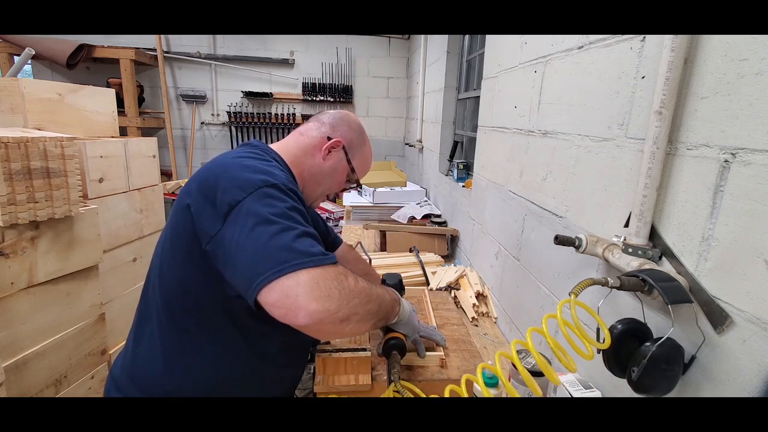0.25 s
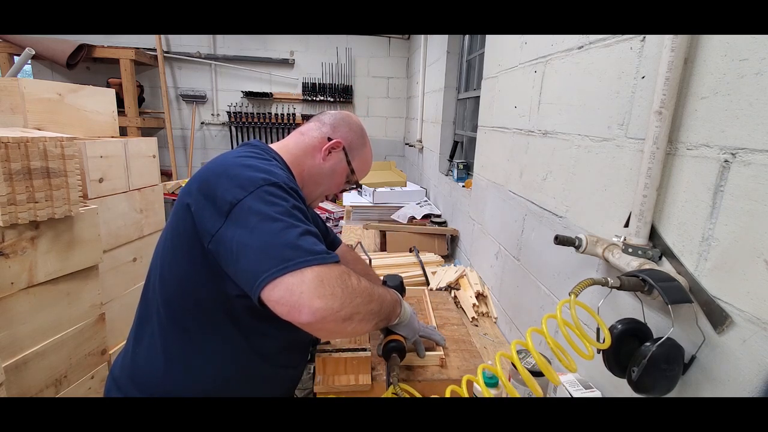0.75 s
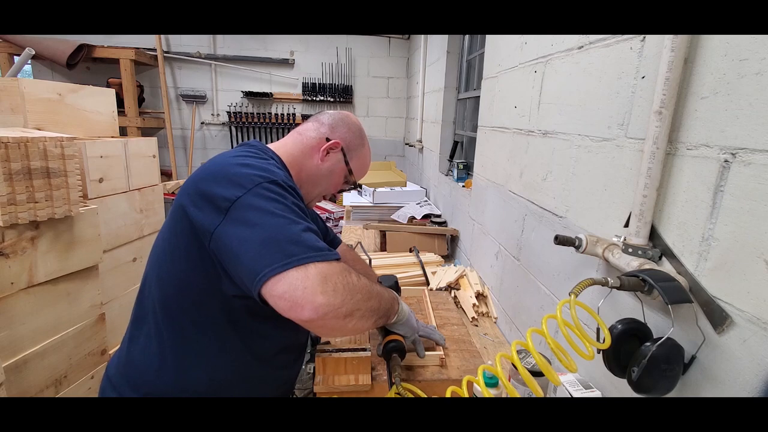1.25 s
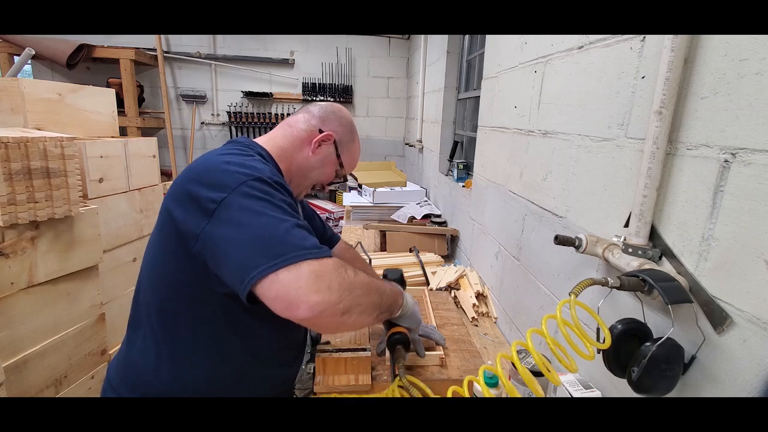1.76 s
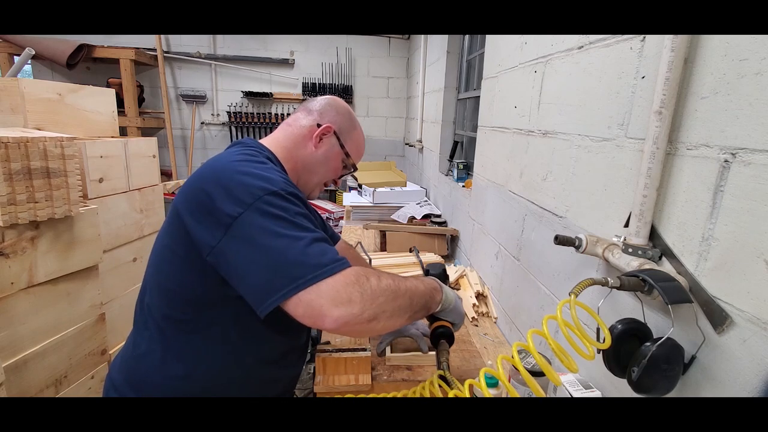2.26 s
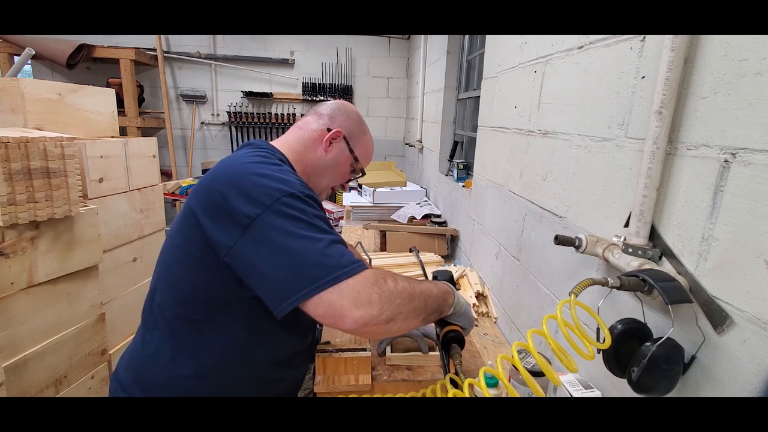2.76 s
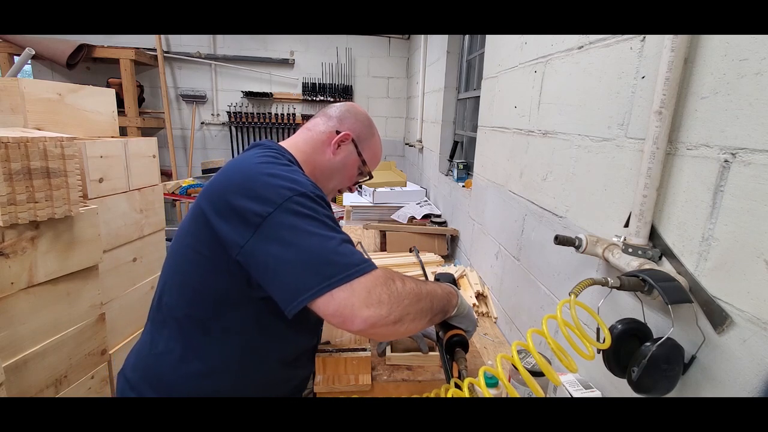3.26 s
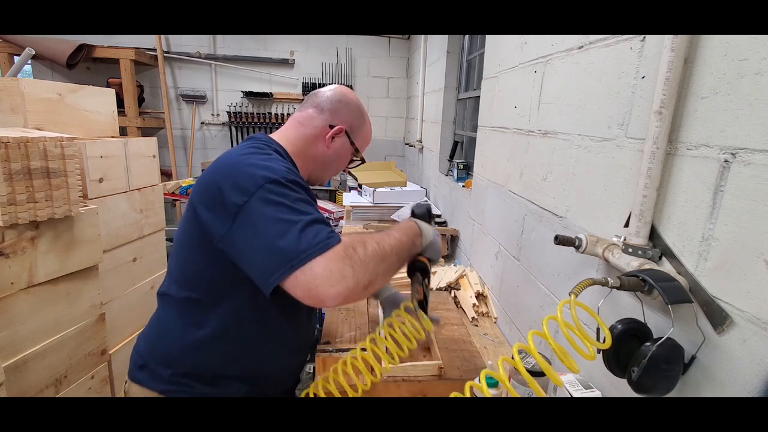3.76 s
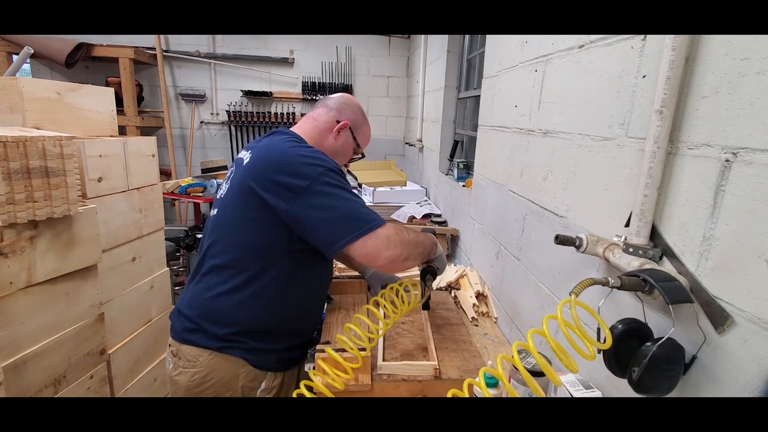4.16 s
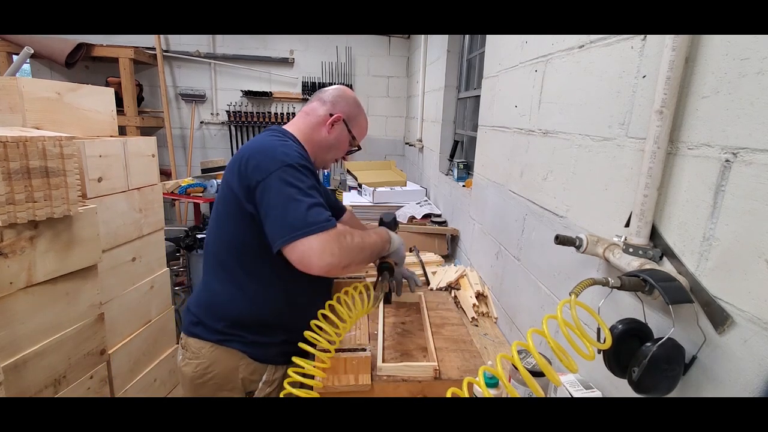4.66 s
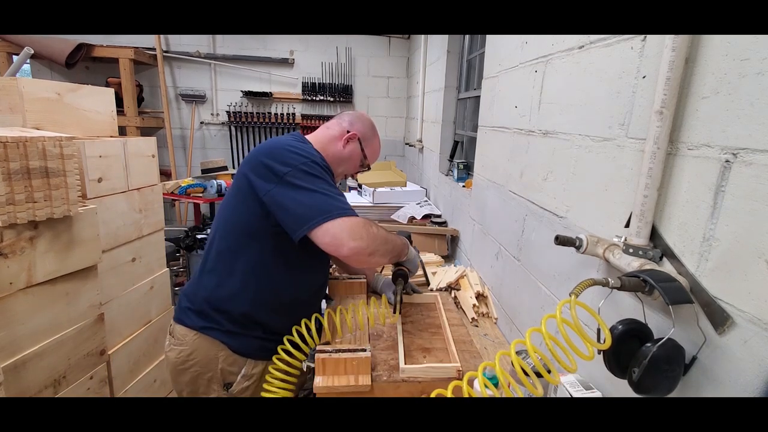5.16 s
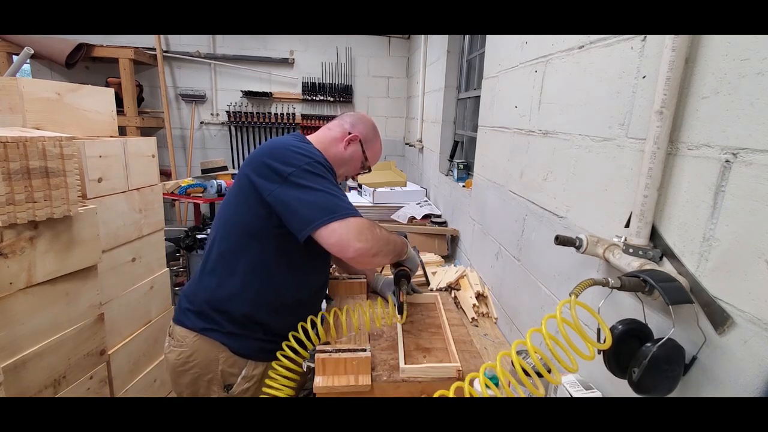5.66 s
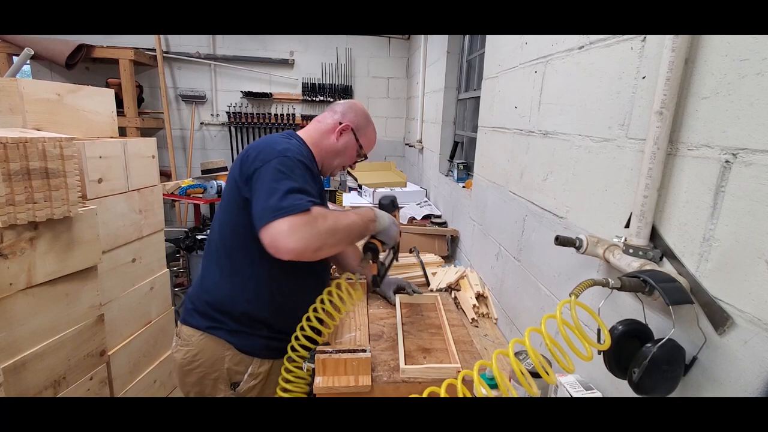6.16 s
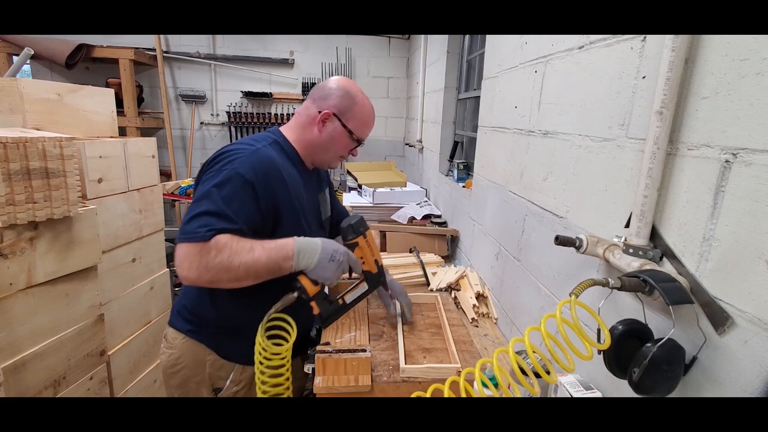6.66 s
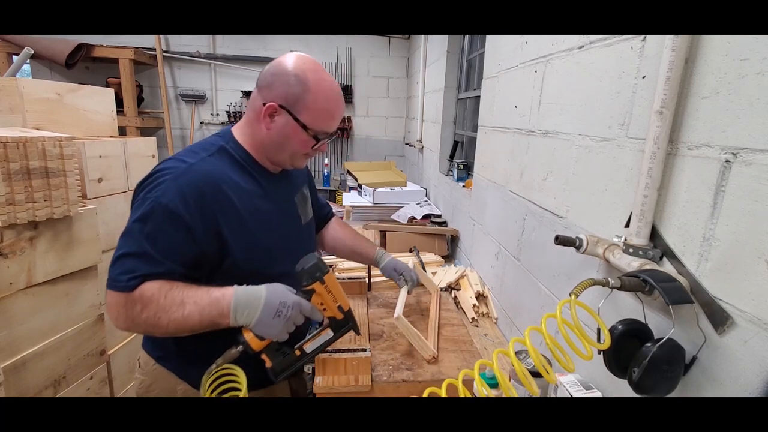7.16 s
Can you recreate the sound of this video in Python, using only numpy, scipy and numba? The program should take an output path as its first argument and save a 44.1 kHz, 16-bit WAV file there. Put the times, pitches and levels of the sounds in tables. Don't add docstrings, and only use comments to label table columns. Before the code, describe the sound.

In a hard-walled workshop, a pneumatic stapler's nose taps and scrapes on wood over low rumble and faint air leak. Four violent shots follow, spaced unevenly, each a pop, slam and bench boom, then a bright exhaust burst about a tenth of a second later. Between them a light pine frame knocks and slides, the hose chirps, and steel clanks before the last shot. Close, overloading phone stereo pickup.

```python
import sys
import numpy as np
from scipy import signal
from scipy.fft import rfft, irfft, next_fast_len
from scipy.io import wavfile
from scipy.ndimage import map_coordinates
from numba import njit

SR = 44100
rng = np.random.default_rng(int(sys.argv[2]) if len(sys.argv) > 2 else 0)


def unload_audio(sound):
    columns = np.transpose(np.atleast_2d(sound))
    steps = np.round(np.clip(columns, -1, 1) * 32767)
    wavfile.write(sys.argv[1], SR, steps.astype(np.int16))


def gain_from_db(level_db):
    decades = np.asarray(level_db, float) / 20
    return 10 ** decades


N = 327486
SPAN = SR // 4

# (frequency [Hz], level [dB per Hz])
RUMBLE_COLOUR = [(15, -54), (25, -16), (98, 1), (130, -10), (182, -5), (358, -25.5), (468, -23), (518, -26),
                 (776, -28.5), (1400, -50), (1820, -70.5), (3080, -120)]
# (frequency [Hz], level [dB per Hz])
SLIDE_COLOUR = [(530, -30), (900, 1.5), (1630, -8), (1870, -16.5), (2010, -6.5), (2620, -13), (3210, -6),
                (4750, -16.5), (8000, -16.5), (10400, -40), (17600, -120)]
# (frequency [Hz], level [dB per Hz])
LEAK_COLOUR = [(3000, -30), (4500, -8), (7200, -6), (9300, -8), (10300, 1), (11200, 4), (12500, 1),
               (15700, 0)]
# (frequency [Hz], level [dB per Hz])
HUM_COLOUR = [(12, -41.5), (20, -0.5), (75, -5.5), (231, -20), (299, -13), (600, -26), (780, -59.5),
              (1320, -120)]
# (time [s], level [dB])
MUTING = [(0, -1), (1.6, -1), (2.1, -28), (2.4, -15.5), (3.02, -15), (3.25, 5), (3.8, -18), (4.01, -5),
          (4.73, -6), (4.92, 0), (5.11, 1), (5.3, 2.5), (5.85, 1.5), (6.45, -12.5), (6.7, -11),
          (6.86, -1.5), (7.07, 13.5), (7.43, 3.5)]
# (time [s], level [dB])
LEANING = [(0, -40.5), (0.76, -45), (1.01, -54), (1.3, -49), (1.7, -51), (2.33, -81.5), (2.65, -84),
           (3.02, -43.5), (3.3, -51), (3.75, -39), (4.45, -41), (4.73, -52), (5.25, -36), (5.63, -40.5),
           (5.8, -28.5), (6.5, -66), (6.84, -56), (6.9, -38)]
# (middle [s], half length [s], level [dB])
STROKES = [
    (0.02, 0.29, -62.5),
    (3.62, 0.13, -44),
    (4.419, 0.18, -52.5),
    (4.744, 0.41, -59),
    (5.245, 0.17, -56),
    (6.224, .2, -72),
    (6.907, 0.23, -78),
    (7.085, 0.12, -78.5),
    (7.346, 0.12, -56),
]

# (frequency [Hz], t60 [s])
ROOM_DECAY = [(60, 0.93), (200, 0.39), (700, 0.34), (2000, 0.43), (5000, 0.5), (12000, 0.33)]
# (frequency [Hz], level [dB])
TAIL_COLOUR = [(60, -7), (300, 1.5), (1000, -1), (15000, -3)]
# (frequency [Hz], likeness [0..1])
LIKENESS = [(25, .85), (60, 0.93), (200, 1), (500, 0.7), (1200, 0.055), (4000, 0.046), (15000, 0.035)]
# (frequency [Hz], level [dB])
SIDES = [(60, -2), (300, -4.5), (1200, -5.5), (4000, -6.5), (15000, -4.5)]

# (time [s], frequency [Hz], level [dB rms], t60 [s])
SHAKES = [(.433, 3450, -56.5, 0.047), (1.176, 2800, -51, 0.042), (1.222, 2750, -60, .05),
          (1.318, 2700, -58, .05), (1.373, 1600, -61, .15), (1.376, 800, -54.5, 0.1),
          (2.541, 5700, -64, .18), (2.615, 2800, -73, .1), (2.764, 1005, -61, .25),
          (2.764, 2000, -68, 0.18), (2.764, 3300, -69, 0.2), (2.956, 2800, -66, 0.29),
          (2.956, 1512, -60.5, 0.27), (3.075, 1005, -52.5, 0.074), (3.997, 1055, -39.5, 0.22),
          (4.719, 3300, -46, 0.06), (4.719, 1500, -44.5, 0.12), (4.768, 1450, -38, 0.083),
          (5.056, 1320, -42.5, 0.33), (5.056, 2300, -54, 0.25), (6.848, 3120, -62, 0.078),
          (7.035, 3400, -51, .06), (7.047, 3200, -52.5, .12), (7.072, 3300, -52.5, 0.23),
          (7.136, 3400, -55, .15), (7.17, 3220, -58, 0.17)]
# (time [s], level [dB], frequency [Hz], t60 [s])
BOARDS = [(.148, -20, 485, 0.092), (.21, -32, 492, 0.16), (0.298, -30, 197, 0.24), (0.685, -22, 234, 0.062),
          (.709, -31.5, 592, 0.11), (0.758, -23, 76, 0.29), (1.577, -14.5, 428, 0.22),
          (1.586, -5, 295, 0.11), (1.605, -11, 684, 0.044), (1.63, -13, 860, 0.026),
          (1.65, -13, 497, 0.065), (3.286, 0.5, 552, 0.062), (3.295, -8, 323, 0.089),
          (3.315, -5, 664, 0.064), (3.34, -11, 808, 0.069), (3.377, -3, 540, 0.025),
          (3.754, -23, 240.5, 0.24), (3.795, -26, 430, 0.072), (3.818, -15.5, 205, 0.12),
          (3.855, -23.5, 321, 0.13), (4, -41, 1020, 0.15), (4.059, -4, 810, 0.065),
          (4.064, -12, 1216, 0.048), (4.072, -1.5, 760, 0.031), (4.079, -1.5, 203, 0.11),
          (4.09, -2, 305, 0.1), (4.098, -2.5, 846, 0.046), (4.446, -46, 1057, .15), (4.462, -42.5, 802, .1),
          (4.621, -44, 1053, 0.089), (5.352, -21.5, 103.3, 0.39), (5.638, -15.5, 510, 0.095),
          (5.663, -29, 470, 0.06), (5.688, -19, 484, 0.09), (5.713, -24.5, 476, 0.076),
          (5.764, -30.5, 473, 0.052), (5.824, -8.5, 1174, 0.062), (5.84, -3, 225.6, 0.16),
          (5.849, -7.5, 630, 0.078), (5.865, -3.5, 410, 0.078), (5.88, -13.5, 726, 0.037),
          (7.309, -18.5, 797, 0.086), (7.32, -15, 428, 0.068), (7.389, -24, 195, 0.32)]
# (time [s], level [dB], frequency [Hz], t60 [s])
MORE_BOARDS = [(.149, -25, 730, 0.063), (.16, -25, 333, 0.086), (.434, -31, 330, .12), (.44, -48, 550, 0.088),
               (.703, -33, 481, .12), (.74, -35.5, 556, 0.11), (0.836, -27, 85, 0.16), (1.346, -33, 95, 0.54),
               (3.746, -27.5, 618, .07), (3.77, -28.5, 760, .06), (3.878, -28.5, 200, 0.17),
               (4, -27.5, 110, .3), (4.066, -6, 120.6, 0.35), (5.523, -12.5, 97.6, 0.28),
               (5.637, -24, 987, 0.065), (5.637, -28.5, 1285, 0.041), (5.642, -27.5, 710, 0.075),
               (5.696, -32.5, 900, 0.092), (6.875, -36, 199.8, 0.34), (6.88, -50, 330, 0.22),
               (0.1526, -11, 192, 0.2), (6.865, -31.5, 92, .5), (7.02, -33, 95, 0.47), (7.136, -24, 96, 0.42),
               (6.277, -44, 1350, .014), (6.314, -43, 1290, 0.016), (7.311, -17.5, 99.9, 0.19),
               (6.381, -42, 3720, .012)]
# (middle [s], half length [s], frequency [Hz], level [dB rms])
SCRAPES = [(0.132, 0.0063, 3138, -40.5), (0.71, 0.034, 2990, -51.5), (1.2015, 0.034, 2840, -65.5),
           (1.339, 0.034, 2630, -65), (2.547, 0.026, 3086, -69), (3.2, 0.012, 6130, -60.5),
           (3.229, 0.0099, 6440, -49), (3.5, .012, 2833, -54), (4.9, .04, 3200, -50),
           (6.4, 0.0092, 2785, -63), (6.785, 0.056, 3600, -57), (7.205, 0.073, 3500, -59.5),
           (4.464, 0.028, 1973, -50.5), (6.733, 0.038, 3770, -64), (5.644, 0.0072, 1089, -51.5),
           (5.703, 0.019, 901, -51.5), (7.315, 0.011, 530, -29.5), (0.71, .02, 1147, -44.5),
           (4.571, 0.11, 1056, -54), (0.159, .014, 2700, -54), (0.14, .012, 3900, -39),
           (3.75, 0.011, 3600, -47.5), (3.859, 0.008, 1990, -59), (4.776, .025, 1495, -45),
           (7.148, 0.14, 250, -53)]
# (middle [s], half length [s], frequency [Hz], level [dB])
SQUEAKS = [
    (4.452, .012, 2130, -55),
    (4.54, .012, 2130, -55),
    (4.56, .02, 2150, -61),
    (4.617, .024, 2130, -50),
    (4.65, .01, 2170, -58),
    (6.24, .04, 1500, -62),
]
# (time [s], peak level [dB], thump level [dB])
CLANK = [
    (5.218, -14.5, -33),
    (5.2268, -20, -38.5),
    (5.238, -22, -39),
]
# (frequency [Hz], level [dB], t60 [s])
MAGAZINE_MODES = [(890, -11.5, 0.32), (1124, -4, 0.11), (1394, -7, 0.046), (1690, -3.5, 0.08),
                  (1873, -5, 0.12), (2300, -2, 0.039), (2460, -14.5, 0.17), (2620, 2.5, 0.026),
                  (3300, -13.5, 0.049), (4000, -13.5, 0.023), (4660, -16.5, 0.054)]
# (time [s], clack level [dB], hardness = tick over clack [dB], bench thump level [dB], thump pitch [Hz])
TAPS = [(0.0224, -39, -22, -34.5, 198.5), (0.099, -50, -1.5, -31, 188), (0.147, -10.5, -11.5, -13, 192.7),
        (0.4329, -38.5, -30, -26.5, 196), (0.671, -52, -19, -30, 189.7), (0.699, -30.5, -20, -24.5, 72),
        (1.1763, -52, -11, -56, 77), (1.3106, -56, -1.5, -39.5, 90.4), (3.6381, -35, -7, -25.5, 242),
        (4.7188, -28, -18.5, -23.5, 111.5), (4.768, -23, -12.5, -28, 188.3),
        (5.0616, -39, -21.5, -38.5, 184.5), (5.109, -17.5, -26.5, -24.5, 249),
        (5.1605, -27, -15, -34.5, 111.9), (5.3574, -38.5, -15.5, -26.5, 95.8), (5.414, -39, -32, -34, 86),
        (6.196, -27.5, -27.5, -49.5, 71.2), (6.2763, -31, -26, -57.5, 108.9), (6.3135, -53, -10, -49, 174),
        (6.3825, -42.5, -2.5, -55, 133.2), (6.873, -58.5, -12.5, -45, 102.4),
        (7.1396, -62.5, -6.5, -48, 94), (7.423, -43, -10, -28, 73.4)]
# (time [s], wood level [dB], edge = clack over wood [dB], bench thump level [dB], thump pitch [Hz])
BUMPS = [(0.8341, -58, -3, -39, 85.2), (1.3801, -47.5, -11.5, -34, 94.9), (2.5435, -48.5, 0.5, -57, 256.7),
         (2.766, -53.5, -5, -58, 187.4), (2.8272, -53, -10, -54.5, 191), (2.9594, -42.5, -8.5, -35, 83.1),
         (3.0751, -43, -8, -31.5, 76.7), (3.7433, -22, -13.5, -19, 237.5),
         (3.798, -33, -26.5, -25.5, 119.9), (3.854, -33, -18, -26, 110.5),
         (3.9518, -35.5, -13.5, -46.5, 95.8), (3.998, -31.5, -2, -32.5, 96.8),
         (4.851, -43, -9, -31.5, 168.5), (5.5233, -39, -27, -29.5, 99.3), (5.576, -30.5, -11.5, -22, 79.6),
         (5.636, -23.5, -30, -27, 123), (5.688, -31, -34.5, -28.5, 96.7), (6.9085, -75, -7, -29, 97),
         (7.2111, -65, -3.5, -36, 95.5), (7.3096, -20, -12.5, -9, 200.9)]
# (frequency [Hz], level [dB], t60 [s])
NOSE_MODES = [(1450, -2, 0.0067), (2040, -5, 0.015), (2800, 0, .011), (3400, -2.5, 0.011),
              (3940, -2.5, 0.014)]
# (frequency [Hz], level [dB], t60 [s])
FRAME_MODES = [(438, 0.5, 0.086), (560, 0.5, 0.029), (760, -5, 0.045), (1044, -9, 0.024),
               (1320, -24.5, 0.02)]
# (frequency [Hz], level [dB], t60 [s])
BENCH_MODES = [(75.54, -0.5, 0.48), (115, 2.5, 0.21), (192, 6.5, 0.15), (252, -2, 0.16), (293, -4, 0.35),
               (356, -4.5, 0.32), (420, -9.5, 0.15), (560, -3.5, 0.42), (665, -7, 0.057), (723, -9, 0.22),
               (925, -13.5, 0.035), (1370, -6.5, 0.17)]
# (frequency [Hz], level [dB per Hz])
GRAIN_COLOUR = [(250, -12.5), (450, 1), (800, -3.5), (1300, -11), (1800, -26), (3000, -42), (6000, -78.5)]
# (frequency [Hz], level [dB per Hz])
CLACK_COLOUR = [(290, -39.5), (500, -10), (1430, -8.5), (1880, -5.5), (2080, -12), (2580, -7.5),
                (4280, -18.5), (15600, -35)]
# (frequency [Hz], level [dB per Hz])
TICK_COLOUR = [(2500, -31.5), (5000, -1.5), (9000, -5), (15800, -6)]

# (time [s], valve pop [dB], piston slam [dB], bench boom [dB], boom pitch [Hz])
SHOTS = [
    (1.5599, -2.5, -5.5, -11.5, 198.4),
    (3.2662, 0.5, -8.5, -8, 191.5),
    (4.0476, -2.5, -6.5, -8, 123.1),
    (5.8201, -0.5, -6.5, -12, 221.2),
]
TRAVEL = [
    .014,
    0.011,
    .0113,
    .0117,
]
# (time [s], valve pop [dB], exhaust level [dB rms], exhaust length [s], piston return knock [dB])
RELEASES = [
    (1.6915, 3.5, -2.5, 0.046, -21.5),
    (3.3907, 4.5, -3.5, 0.046, -27.5),
    (4.1382, 4.5, 0, 0.048, -28.5),
    (5.905, 3.5, -0.5, 0.047, -19),
]
# (frequency [Hz], level [dB], t60 [s])
DRIVER_MODES = [(1115, -2.5, 0.024), (1750, 1.5, 0.023), (2700, -1, 0.014), (3410, -3.5, .015),
                (4380, -4, .012)]
# (frequency [Hz], level [dB per Hz])
SLAM_COLOUR = [(180, -32), (300, -2.5), (809, -13.5), (1090, -14), (1350, -12.5), (2040, -14),
               (2750, -13.5), (5510, -20.5), (11800, -22), (15600, -27.5)]
# (frequency [Hz], level [dB per Hz])
EXHAUST_COLOUR = [(350, -45), (600, -4.5), (903, -14), (1050, -10), (1940, -10.5), (2800, -2.5), (3530, 2),
                  (4110, -0.5), (6710, 2.5), (9830, -2), (11100, 4), (14000, -0.5), (15600, 6.5)]
# (frequency [Hz], level [dB per Hz])
RATTLE_COLOUR = [(24, -44.5), (40, -11.5), (91, 1), (146, 6), (205, -0.5), (556, -10), (660, -12),
                 (740, -8), (997, -17), (1200, -16), (1560, -49.5), (2640, -120)]


def unit(x):
    return x / np.sqrt(np.mean(x ** 2) + 1e-20)


def along(points, hz):
    f, v = np.transpose(points)
    return np.interp(np.log(hz + 1), np.log(f + 1), v)


def after(t, delay):
    return np.clip(t - delay, 0, 1)


def decay(t, t60):
    return gain_from_db(-60 * t / t60)


def swell(t, length):
    return np.exp(-((t - length) / (length * 0.51)) ** 2)


def wobble(rate):
    knots = rng.standard_normal(int(N * rate / SR) + 4)
    return map_coordinates(knots, [np.arange(N) * rate / SR])


def lumps(db, hold):
    return gain_from_db(db * np.repeat(rng.standard_normal(SPAN // hold + 1), hold)[:SPAN])


def filtered(x, response):
    m = next_fast_len(x.shape[-1] + 4096)
    return irfft(rfft(x, m) * response(np.fft.rfftfreq(m, 1 / SR)), m)[..., :x.shape[-1]]


def spread(two):
    def mid_side_gain(hz):
        turn = np.arccos(np.clip(along(LIKENESS, hz), 0, 1)) / 2
        return np.array([np.cos(turn), np.sin(turn)])

    mid, side = filtered(two, mid_side_gain)
    return np.array([mid + side, mid - side])


def noise(colour, count):
    return unit(filtered(rng.standard_normal(count), lambda hz: gain_from_db(along(colour, hz))))


def pair(colour, count):
    return spread(np.array([noise(colour, count), noise(colour, count)]))


def ring(modes, t, attack, scatter_db=3, detune=.03):
    hz, db, t60 = np.transpose(modes)[..., None]
    size, bend = rng.standard_normal((2, *hz.shape))
    waves = gain_from_db(db + scatter_db * size) * decay(t, t60) * np.sin(2 * np.pi * hz * (1 + detune * bend) * t)
    sign = (-1.) ** np.arange(len(modes))[:, None]
    return (sign * waves).sum(0) * (1 - np.exp(-t / attack))


def add(out, s, dry, wet_db, mute_db=55, bass_db=0):
    hz, t, z = signal.stft(rng.standard_normal((2, SR * 3 // 4)), SR, nperseg=256)
    hz = hz[:, None]
    tail_db = along(TAIL_COLOUR, hz) + bass_db * (hz < 300)
    tail_db = tail_db - 60 * t / along(ROOM_DECAY, hz) - mute_db * t * t
    tail = signal.istft(z * gain_from_db(tail_db), SR, nperseg=256)[1]
    tail = spread(tail * np.clip(np.arange(tail.shape[1]) / (0.024 * SR) - .2, 0, 1))
    answer = gain_from_db(wet_db) * tail / np.linalg.norm(tail, axis=1, keepdims=True)
    answer[:, 0] += 1
    lags = rng.uniform(.001, .012, 6) + rng.uniform(0, 0.00042, (2, 6))
    answer[[[0], [1]], (lags * SR).astype(int)] += .2 * rng.uniform(-1, 1, 6)
    both = signal.fftconvolve(np.atleast_2d(dry), answer, axes=1)
    start = round(s * SR)
    out[:, start:start + both.shape[1]] += both[:, :N - start]


def stirred(t, db, fall, bend):
    since = t - np.array(RELEASES)[:, :1]
    fading = gain_from_db(db - fall * np.abs(since) - bend * since ** 2)
    return (fading * np.clip(since / .02, 0, 1)).sum(0)


def background():
    t = np.arange(N) / SR
    through = gain_from_db(np.interp(t, *np.transpose(MUTING)))
    leaning = gain_from_db(np.interp(t, *np.transpose(LEANING)))
    strokes = sum(gain_from_db(db) * swell(t - s + half, half) for s, half, db in STROKES)

    rumble_gain = leaning + stirred(t, db=-30, fall=49, bend=80)
    rumble = rumble_gain * gain_from_db(4.2 * wobble(14)) * pair(RUMBLE_COLOUR, N)
    slide_gain = gain_from_db(-71) * through + strokes + stirred(t, db=-44.5, fall=30, bend=700)
    slide = slide_gain * gain_from_db(1.3 * wobble(42) + 0.67 * wobble(290)) * pair(SLIDE_COLOUR, N)
    hiss_gain = gain_from_db(-65) * through + stirred(t, db=-41, fall=60, bend=350)
    hiss = hiss_gain * gain_from_db(.8 * wobble(11.0)) * pair(LEAK_COLOUR, N)
    return rumble + slide + hiss + gain_from_db(-71.0) * pair(HUM_COLOUR, N)


def shakes():
    out, t = np.zeros((2, N + SPAN)), np.arange(SPAN) / SR
    for s, hz, db, t60 in SHAKES:
        colour = [(hz * .4, -40), (hz * 0.92, -14), (hz, 0), (hz * 1.15, -14), (hz * 2.3, -30), (hz * 4, -70)]
        envelope = gain_from_db(db) * decay(t, t60) * (1 - np.exp(-t / 0.0016))
        out[:, round(s * SR):][:, :SPAN] += envelope * lumps(3, 100) * pair(colour, SPAN)
    return out[:, :N]


def boards():
    out, t = np.zeros((2, N + SPAN)), np.arange(SPAN) / SR
    for s, db, hz, t60 in BOARDS + MORE_BOARDS:
        side, upper = rng.uniform(-1.1, 1, 2)
        upper_hz = hz * (1.9 + 0.29 * upper)
        note = np.sin(2 * np.pi * hz * t) + 0.054 * decay(t, t60) * np.sin(2 * np.pi * upper_hz * t)
        note *= gain_from_db(db) * decay(t, t60) * (1 - np.exp(-t * hz / 1.1))
        out[:, round(s * SR):][:, :SPAN] += note * gain_from_db(1.5 * side * np.array([[1], [-1]]))
    return out[:, :N]


def scrapes(out):
    t = np.arange(SPAN) / SR
    for s, length, hz, db in SCRAPES:
        colour = [(hz * .3, -22), (hz * .85, -9), (hz, 0), (hz * 1.15, -8),
                  (hz * 2.5, -22), (hz * 5, -38), (hz * 9, -70)]
        drag = gain_from_db(db) * swell(t, length) * lumps(2.2, 100) * pair(colour, SPAN)
        add(out, s - length, drag, wet_db=-7.0)


def hose_squeaks(out):
    t = np.arange(SPAN) / SR
    for s, length, hz, db in SQUEAKS:
        phase = 2 * np.pi * hz * t + 0.14 * np.cumsum(rng.standard_normal(SPAN))
        tone = np.sin(phase) + .6 * np.sin(phase / 2)
        add(out, s - length, gain_from_db(db) * swell(t, length) * tone, wet_db=-10)


def magazine_clank(out):
    t = np.arange(SPAN) / SR
    for s, db, thump_db in CLANK:
        crack = decay(t, 0.05) * pair(CLACK_COLOUR, SPAN)
        tones = ring(MAGAZINE_MODES, t, .0003, scatter_db=3, detune=.012)
        steel = gain_from_db(db - 8.5) * (tones + 1.4 * crack)
        add(out, s, steel + gain_from_db(thump_db) * ring(BENCH_MODES[:6], t, 0.00083), wet_db=-6)


def contacts():
    events = []
    for s, clack_db, hardness, thump_db, hz in TAPS:
        wood_db = (clack_db + thump_db) / 2 - 5
        events.append((s, clack_db, clack_db + hardness, wood_db, thump_db, hz))
    for s, wood_db, edge, thump_db, hz in BUMPS:
        clack_db = wood_db + edge
        events.append((s, clack_db, clack_db - 23.5, wood_db, thump_db, hz))
    return events


def knocks(out):
    t = np.arange(SPAN) / SR
    soft = 1 - np.exp(-t / .004)
    for s, clack_db, tick_db, wood_db, thump_db, thump_hz in contacts():
        tick = gain_from_db(tick_db + 7.5) * decay(t, 0.022) * pair(TICK_COLOUR, SPAN)

        dull_db = np.clip(tick_db - clack_db + 12.5, -20, 0) * 0.18
        nose = [(hz, db + dull_db * (hz / 1000 - 1.5), t60) for hz, db, t60 in NOSE_MODES]
        clack = gain_from_db(clack_db - 7) * ring(nose, t, 0.0012, scatter_db=4.5)
        grit = gain_from_db(clack_db - 7) * decay(t, 0.042) * soft * pair(CLACK_COLOUR, SPAN)

        grain = gain_from_db(-0.5) * decay(t, 0.11) * (1 - np.exp(-t / 0.011)) * pair(GRAIN_COLOUR, SPAN)
        wood = 0.72 * ring(FRAME_MODES, t, 0.0021) + grain
        thump = decay(t, 0.11) * np.sin(2 * np.pi * thump_hz * t) * soft
        thump += gain_from_db(-16) * ring(BENCH_MODES[:6], t, .004)

        dry = tick + clack + grit + gain_from_db(wood_db) * wood + gain_from_db(thump_db + 4.0) * thump
        add(out, s, dry, wet_db=-6.5, mute_db=200, bass_db=-4.5)


def pop(t, low_hz, high_hz, length, fade=0.0057):
    u = np.clip(t / length, 0, 1)
    phase = 2 * np.pi * (low_hz * t + (high_hz - low_hz) * t * u / 2)
    return np.sin(phase) * np.clip(t / 0.000067, 0, 1) * decay(after(t, length * 0.84), fade)


def releases(out):
    t = np.arange(SPAN) / SR
    for s, pop_db, blast_db, length, knock_db in RELEASES:
        flow = np.clip((t - .004) / 0.0017, 0, 1) * decay(t, .5) * decay(after(t, length), 0.12)
        valve = pop(t, 1400, 1900, .0012, fade=0.0023)
        valve += 0.64 * pop(after(t, .0016), 2500, 2600, 0.0013, fade=0.0021)
        blast = gain_from_db(blast_db) * flow * pair(EXHAUST_COLOUR, SPAN)
        knock = gain_from_db(knock_db) * ring(FRAME_MODES, after(t, length + .012), 0.0008)
        add(out, s + .0008, gain_from_db(pop_db - 2.5) * valve + blast + knock, wet_db=-10.0)


def bench_boom(touch, hit, boom_hz):
    boom = ring(BENCH_MODES, touch, 0.0033) / 2
    boom += decay(touch, 0.31) * np.sin(2 * np.pi * boom_hz * touch)
    boom += gain_from_db(-29.5) * decay(touch, 2.9) * np.sin(2 * np.pi * 300 * touch)
    boom += gain_from_db(3) * decay(touch, 0.33) * (1 - np.exp(-touch / 0.0016)) * noise(RATTLE_COLOUR, SPAN)
    return boom + gain_from_db(-5.0) * ring(FRAME_MODES, hit, 0.00045)


def shots(out):
    t = np.arange(SPAN) / SR
    lead = .004
    for (s, pop_db, slam_db, boom_db, boom_hz), travel in zip(SHOTS, TRAVEL):
        late = after(t, lead)
        hit = after(t, lead + travel)
        touch = after(t, lead + travel - 0.004)

        rush = gain_from_db(pop_db - 16.5 + 5200 * np.clip(t - lead, -1, 0)) * (t < lead + .002)
        gust = gain_from_db(pop_db - 5.0) * decay(late, 0.062) * (1 - np.exp(-(late / 0.0014) ** 2))
        scatter = gain_from_db(-6.0) * decay(hit, 0.35) * lumps(5.5, 150)
        slam = gain_from_db(slam_db) * (decay(after(hit, .003), 0.0022) + scatter) * (hit > 0)
        air = (rush + gust + slam) * pair(SLAM_COLOUR, SPAN)

        snap = 1.15 * pop(late, 1300, 1300, 0.0014, fade=.0015)
        suck = -gain_from_db(3) * decay(late, .02) * np.sin(2 * np.pi * 190 * after(late, .0009))
        blade = ring(DRIVER_MODES, hit, .0003, detune=0.059)
        blade += gain_from_db(-2.5) * ring(DRIVER_MODES[:3], touch, 0.00033, detune=0.13)

        jolt = gain_from_db(-17.0) * ring(BENCH_MODES, late, 0.003) + gain_from_db(-18) * ring(FRAME_MODES, late, 0.002)
        jolt += gain_from_db(1.0) * pop(touch, 840, 1600, 0.0048)
        boom = gain_from_db(boom_db - 5.0) * (bench_boom(touch, hit, boom_hz) + jolt)
        dry = gain_from_db(pop_db) * (snap + suck) + gain_from_db(slam_db - 3.5) * blade + air + boom
        add(out, s - lead, dry, wet_db=-3.0)


def scene():
    out = background()
    out += shakes() + boards()
    for source in (scrapes, hose_squeaks, magazine_clank, knocks, releases, shots):
        source(out)
    half = np.array([[.5], [-.5]])
    lag = .00004

    def ports(hz):
        tilt = gain_from_db(along(SIDES, hz) * half) * np.exp(-2j * np.pi * hz * lag * half)
        return tilt * 1j * hz / (45 + 1j * hz)

    return filtered(out, ports)


@njit
def follow(level, attack, release):
    out, now = np.empty_like(level), 0.0
    for i in range(len(level)):
        now += (level[i] - now) * (attack if level[i] > now else release)
        out[i] = now
    return out


def band_limit(x):
    return signal.sosfilt(signal.butter(12, 15780, fs=SR, output="sos"), x)


def record(dry):
    level = follow(np.abs(dry).max(0), 1 / (0.01 * SR), 1 / (.06 * SR))
    ducked = dry / np.maximum(level / gain_from_db(-6.0), 1) ** 0.5
    overloaded = ducked / (1 + np.abs(ducked / 1.1) ** 8) ** (1 / 8)
    mix = filtered(overloaded, lambda hz: np.clip((15780 - hz) / 400, 0, 1))
    return band_limit(mix)


dry = scene()
out = record(dry)
unload_audio(out)
```